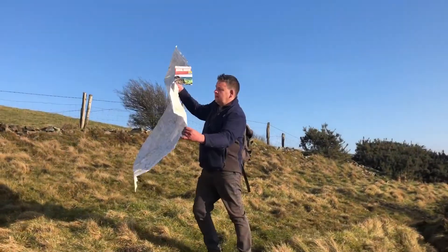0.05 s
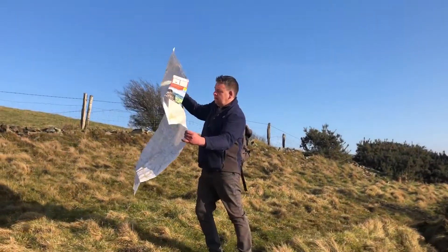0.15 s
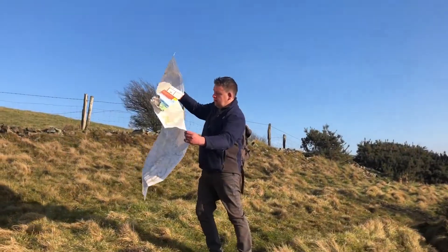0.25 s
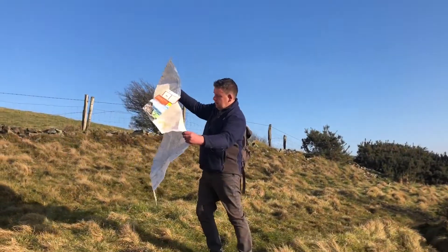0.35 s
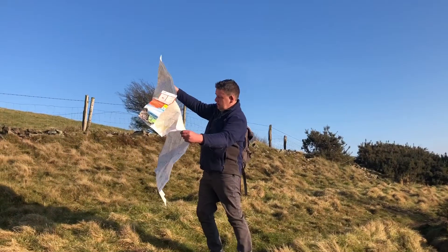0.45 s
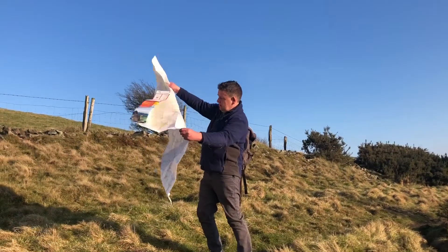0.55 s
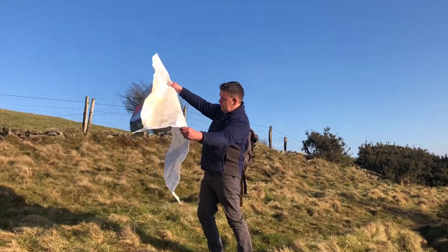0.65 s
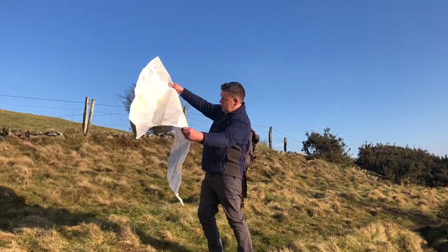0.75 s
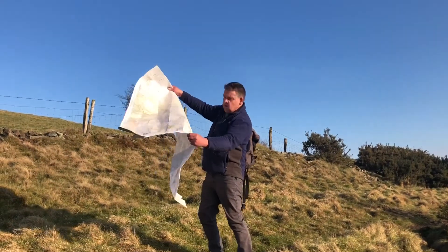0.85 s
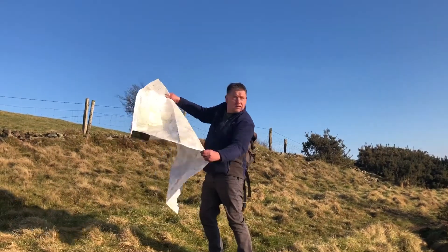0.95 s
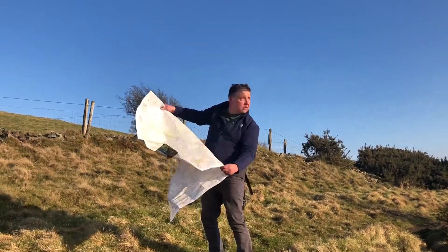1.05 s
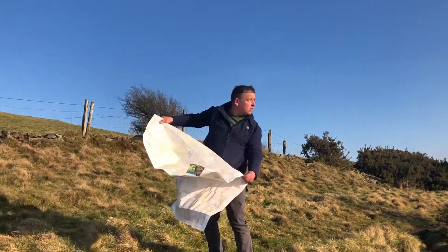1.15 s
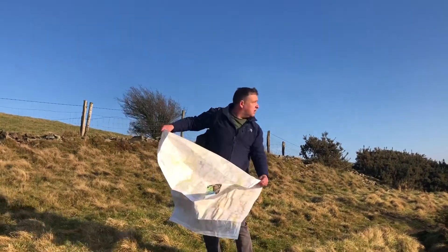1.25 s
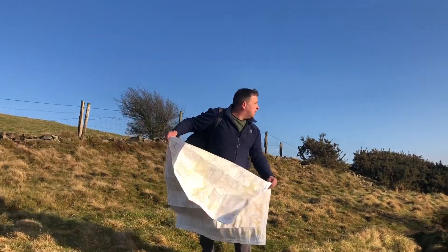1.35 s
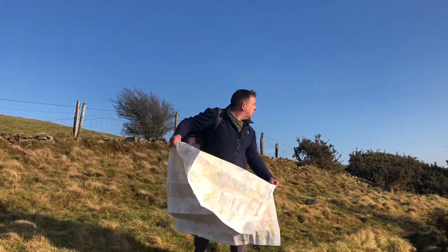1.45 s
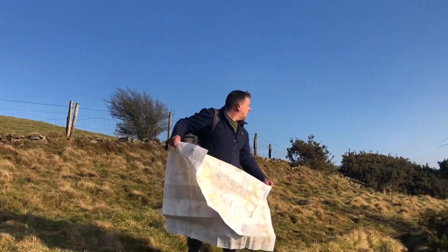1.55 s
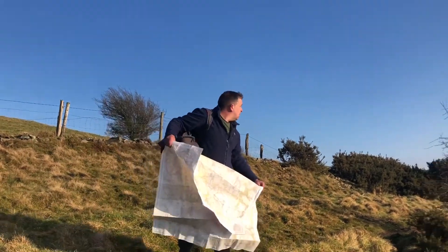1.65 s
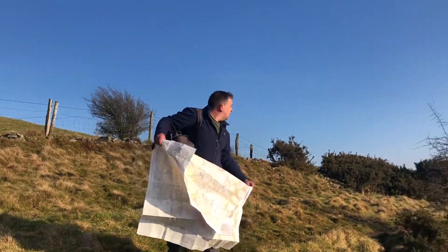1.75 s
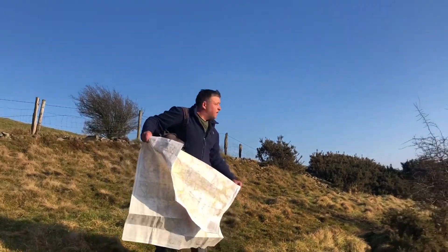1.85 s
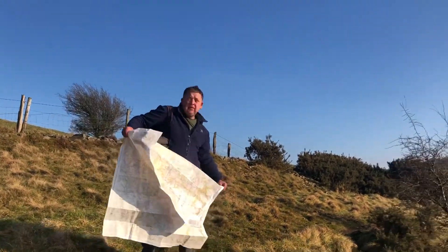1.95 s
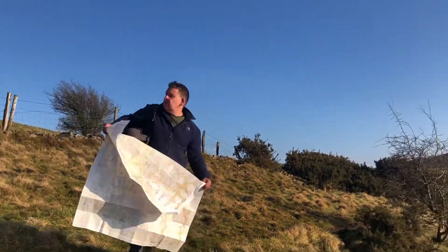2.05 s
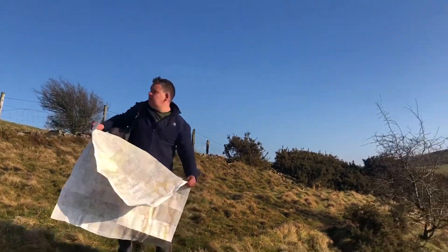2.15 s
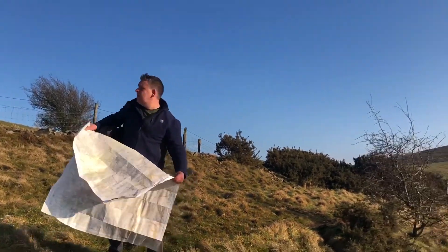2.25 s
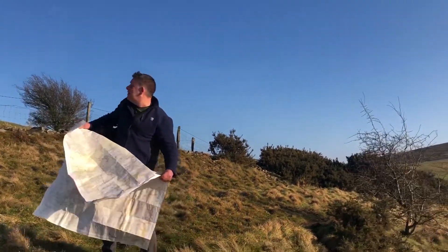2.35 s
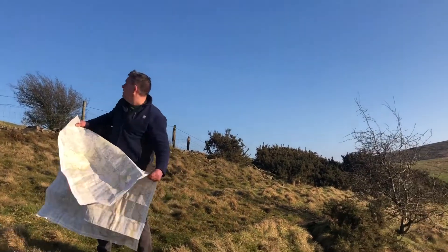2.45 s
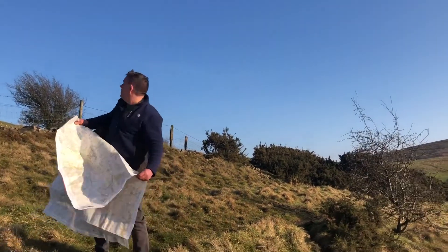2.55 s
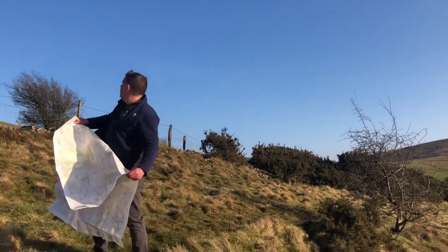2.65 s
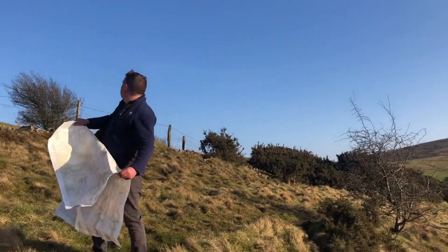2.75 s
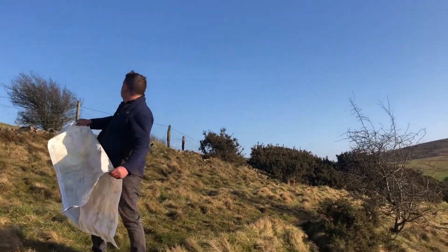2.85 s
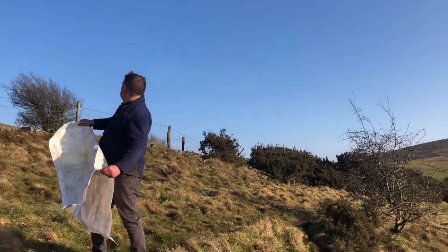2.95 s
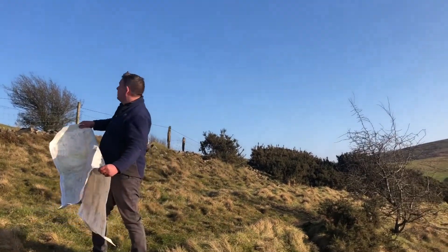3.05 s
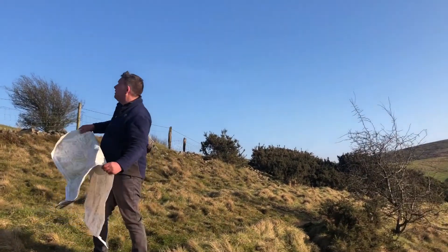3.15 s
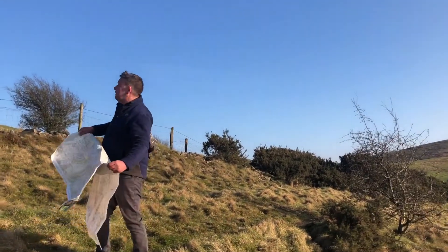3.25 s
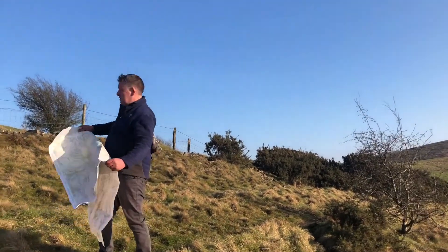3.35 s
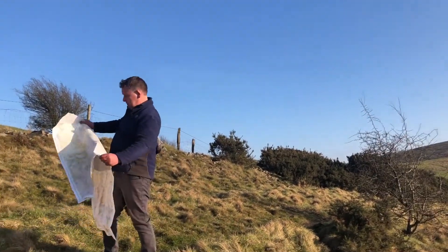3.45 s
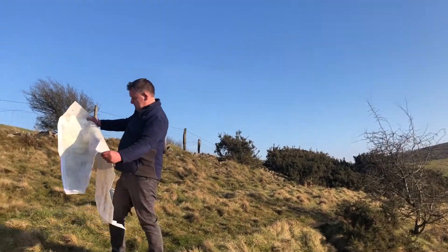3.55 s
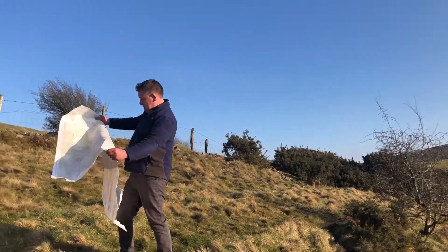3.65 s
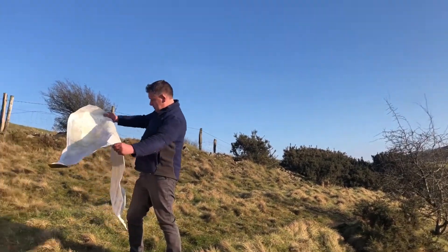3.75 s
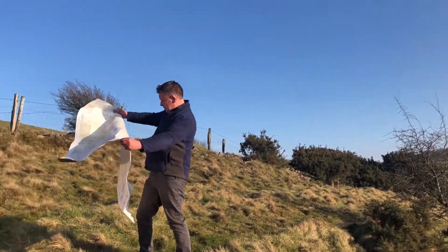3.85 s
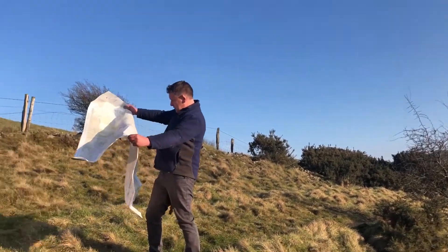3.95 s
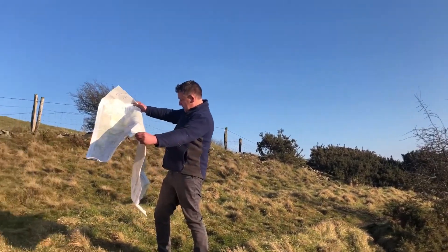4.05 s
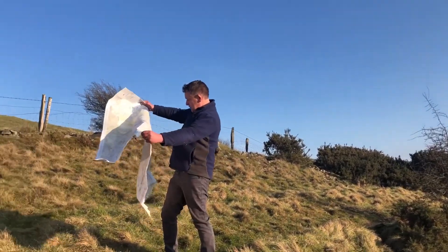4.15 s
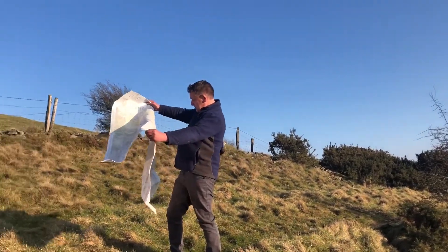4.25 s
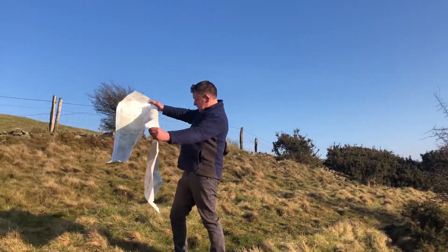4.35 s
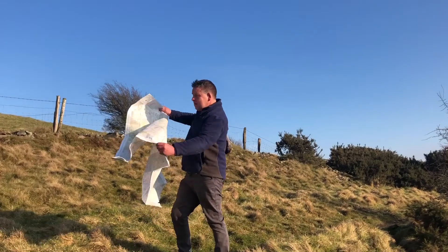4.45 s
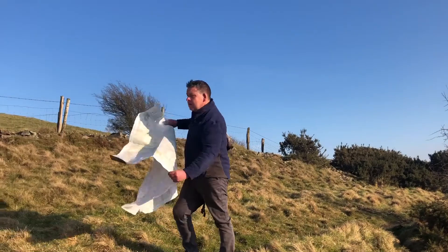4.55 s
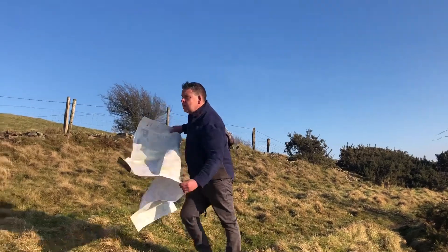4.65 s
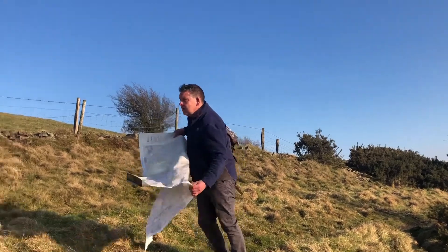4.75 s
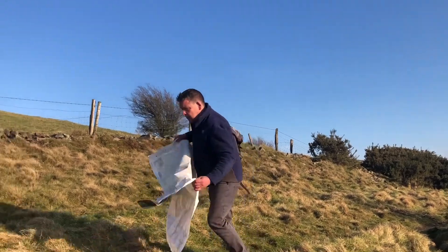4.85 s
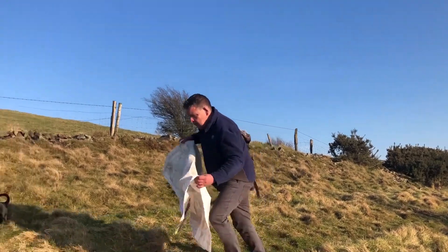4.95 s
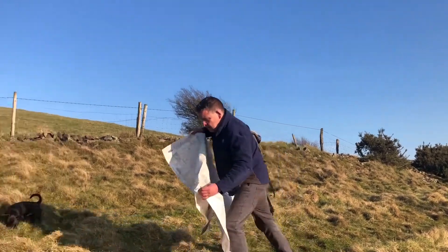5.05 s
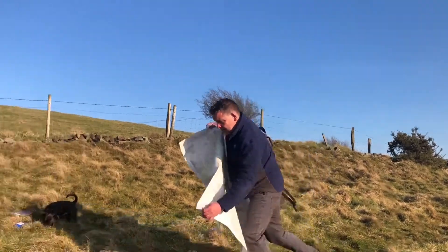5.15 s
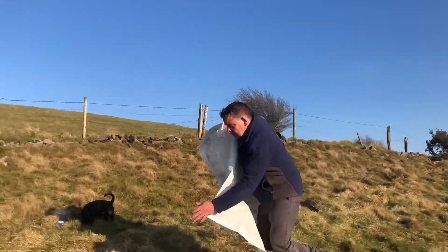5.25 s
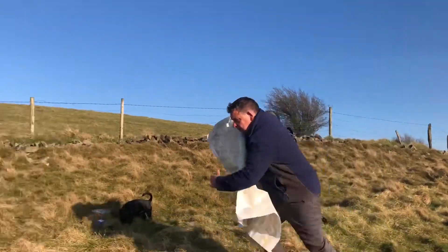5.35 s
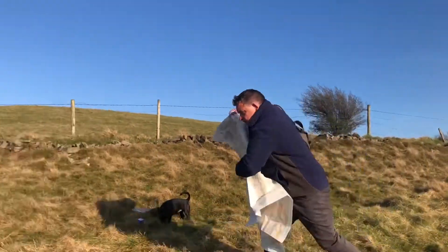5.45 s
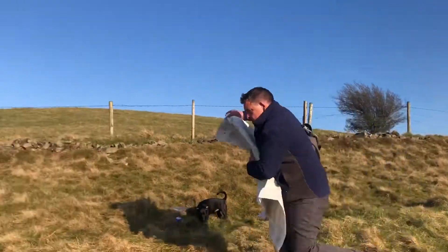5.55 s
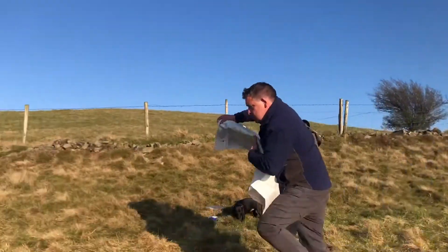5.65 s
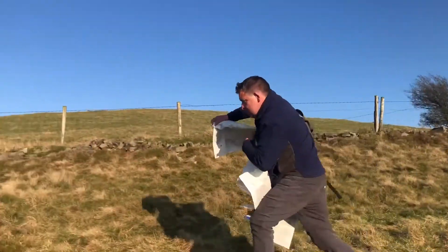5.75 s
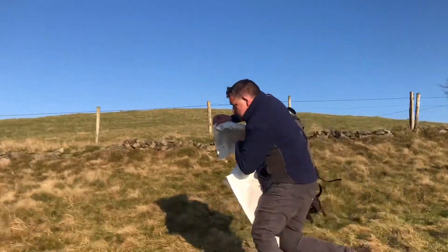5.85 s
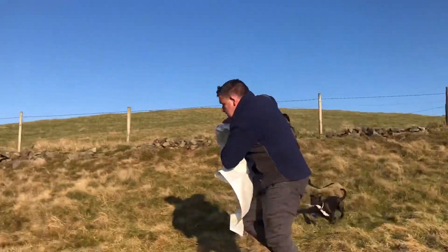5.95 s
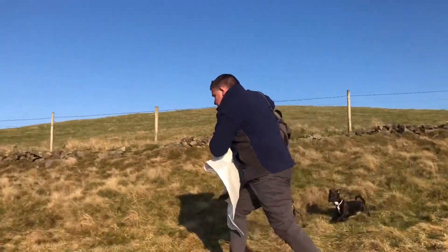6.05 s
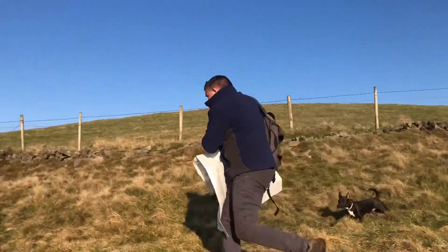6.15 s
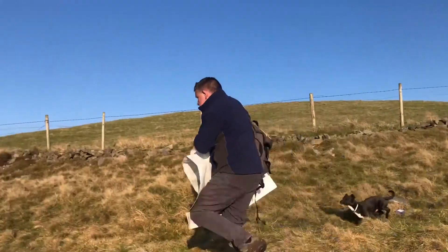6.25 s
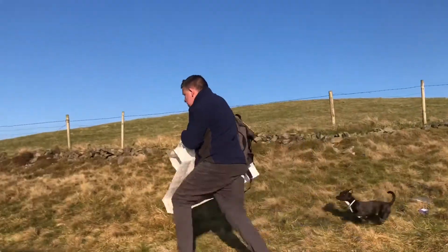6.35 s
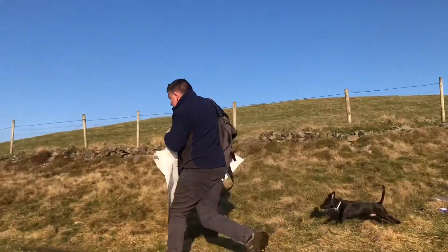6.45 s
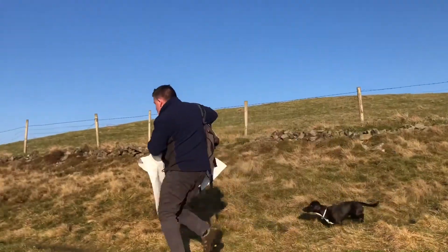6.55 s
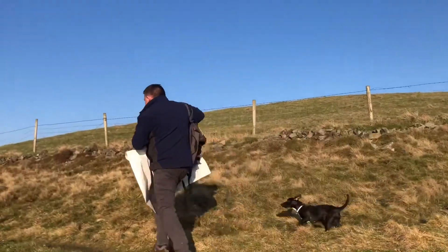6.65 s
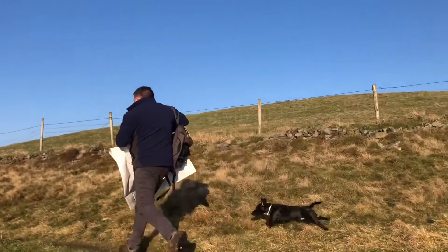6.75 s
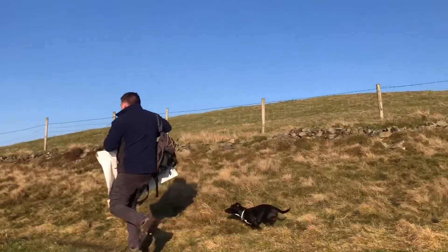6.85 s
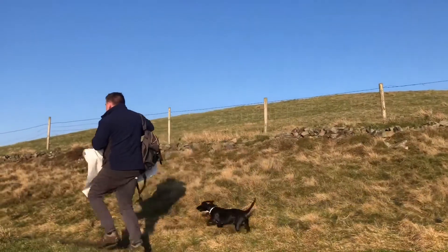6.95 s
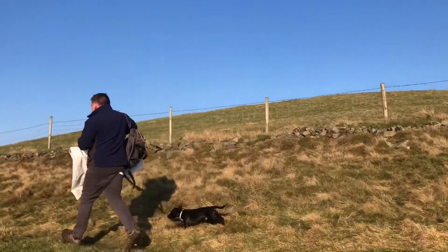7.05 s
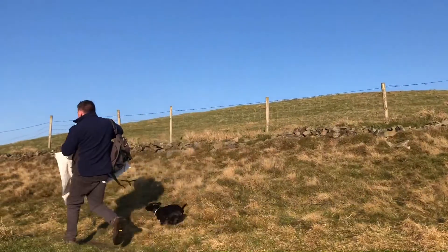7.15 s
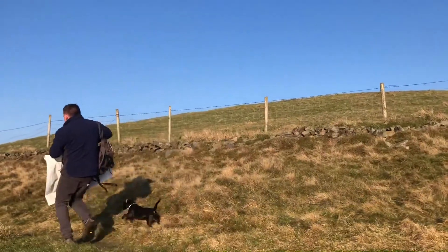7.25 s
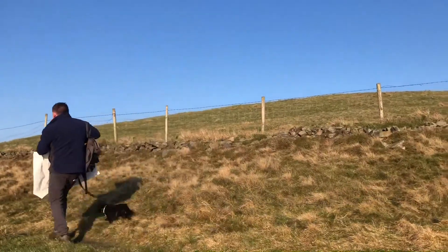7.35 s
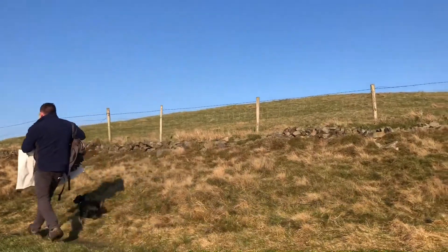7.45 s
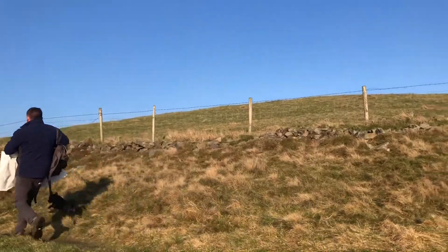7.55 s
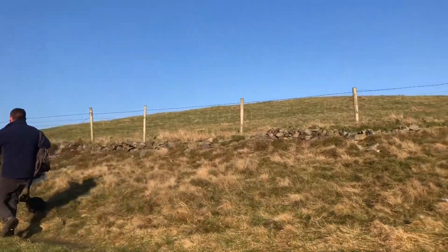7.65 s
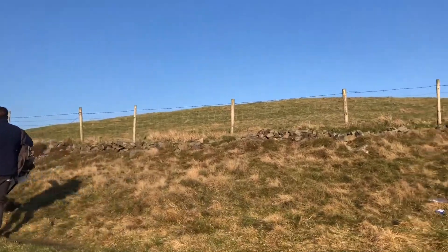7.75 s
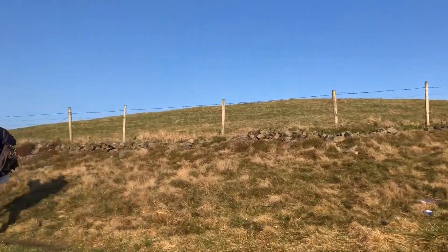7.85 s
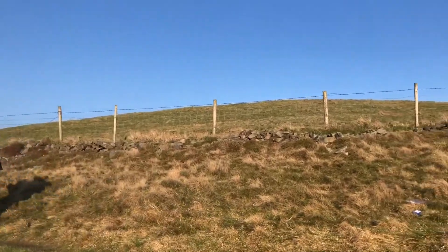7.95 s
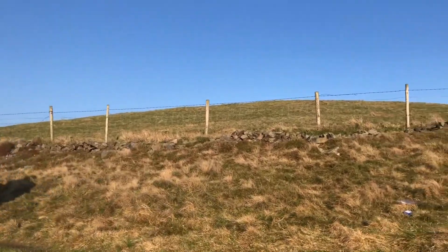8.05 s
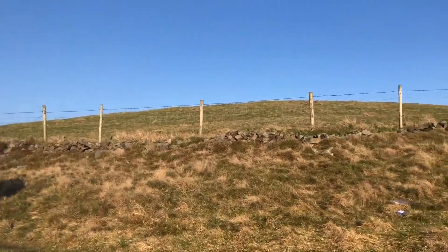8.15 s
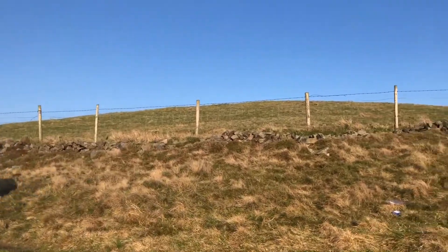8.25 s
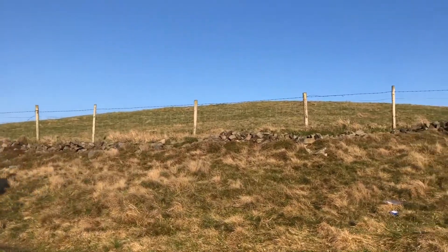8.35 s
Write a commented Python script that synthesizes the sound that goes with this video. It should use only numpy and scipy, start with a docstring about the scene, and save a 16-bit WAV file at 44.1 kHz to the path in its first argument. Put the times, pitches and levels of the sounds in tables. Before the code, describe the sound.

Close, uneven crinkling and snapping of a big paper sheet, growing busier before fading over faint, dull steps on grass.

```python
"""Paper map on a hillside

A large paper map is turned, shaken and bundled up; its holder then walks off through dry grass.
Each crease that buckles sends a burst through the sheet: treble first and short, bass later and longer.
The bursts drive bands of noise that stand for the sheet's dense modes. Footsteps thud on the turf,
and a quiet low wash of air and a faint rising drone lie underneath."""
import sys
import numpy as np
from scipy import signal
from scipy.fft import rfft, irfft, next_fast_len
from scipy.io import wavfile
from scipy.ndimage import uniform_filter1d

SR = 44100
rng = np.random.default_rng(int(sys.argv[2]) if len(sys.argv) > 2 else 0)


def unload_wav(signal):
    """Save mono or channel-first audio to the path in sys.argv[1] as 16-bit WAV at rate SR, clipped to [-1, 1]."""
    wavfile.write(
        sys.argv[1],
        SR,
        np.round(np.clip(np.atleast_2d(signal).T, -1, 1) * 32767).astype(np.int16),
    )


N = 370881
BURST_SAMPLES = 4096
FFT_SIZE = next_fast_len(N + BURST_SAMPLES)
BINS_HZ = np.fft.rfftfreq(FFT_SIZE, 1 / SR)
TIME_S = np.arange(N) / SR

# Bands of the sheet, which scale each buckle's level and decay: centre_hz, share_db, ring_factor, lag_ms
SHEET_BANDS = [(121.6, -16, 2.5, 4.3), (278, -10.5, 3, 7.3), (730, -10.5, 3.3, 1.1), (1115, -7, 2.96, 0.25),
               (2690, -6.5, 1.68, 0.77), (4620, -4, 1.42, 0.27), (8300, -0.5, 1.21, 0.085),
               (13170, -12.5, 0.085, .05)]
# Fader ride of the rustle as the sheet moves: time_s, level_db
RUSTLE_LEVEL = [(0,-63),(.28,-47.5),(.46,-72),(.54,-53),(.72,-71.5),(.81,-57),(1.05,-63.5),(1.3,-63.5),(1.71,-65),(1.76,-53),
                (2.18,-61),(2.32,-71.5),(2.75,-81.5),(3.09,-76.5),(3.36,-78.5),(3.43,-36.5),(3.49,-66),(3.65,-67),(3.78,-86.5),
                (4.368,-89.5),(4.4,-46.5),(4.51,-44.5),(4.74,-54.5),(4.82,-43.5),(4.98,-50.5),(5.51,-39),(5.79,-44.5),(5.91,-38),(6.19,-46.5),(6.28,-39),
                (6.41,-51),(7.32,-56.5),(7.58,-65.5),(7.76,-60.5),(7.84,-70),(8.41,-72.5)]
# Brightness ride of the rustle: time_s, treble_tilt_db
RUSTLE_BRIGHTNESS = [(0,1),(.3,-21),(.9,-20),(1.3,-6),(1.75,-13),(2.1,-2),(2.6,-3),(3.1,4),(3.4,-3.5),(3.6,-21.5),(4.5,-14.5),(5.1,-4.5),(5.8,-8),(6.6,-5),(7.3,-7),(7.6,-3),(8.41,5.5)]
# Creases that snap: peak_s, level_db, bass_tilt_db, treble_tilt_db, base_t60_ms
CREASE_SNAPS = [(0.043,-41.5,-3,-11,28),(0.0643,-41,-18,-10,29),(0.0838,-40,-2,4,23),(0.096,-31,-37,-8.5,20),(0.1868,-25,-10.5,1,27),
                (.256,-33,-12,0,54),(0.3875,-31.5,-4.5,-0.5,43),(.42,-40.5,-2,-4,40),(.453,-35.5,-7,-31,9.7),(0.4877,-42,-3,-11,80),
                (0.5132,-32,-5.5,-14,29),(.582,-39,-9,3,18),(.616,-37.5,-8,-13,25),(0.6357,-37,1,5,43),(0.702,-42,2.5,-12,28),
                (0.774,-47,8,-21,12),(0.7965,-34.5,-9,-1,37),(.8733,-38.5,4,-11,13),(0.895,-36,-13,-16,22),(.91,-41,-12,-19,10),(0.964,-44,-5,-17,20),(.98,-41,-11,-22,28),(0.991,-35.5,-9,-26,18),
                (1.025,-36,-4.5,-7,35),(1.0404,-43.5,4,-6,42),(1.0652,-34,-2.5,-5,25),(1.097,-47,2,-15,20),(1.126,-43,4,-14,15),(1.1415,-32.5,-2.5,-12,19),(1.188,-38,5,-1,32),(1.2793,-44.5,9,-18,21),
                (1.301,-35,0,-9.5,28),(1.3794,-40.5,6,4.5,20),(1.435,-42.5,3.5,-15,16),(1.4647,-36.5,2,-19,25),(1.4747,-34.5,-5,-11,18),
                (1.622,-39,-0.5,-28,8.7),(1.7328,-36,-1,-10,11),(1.741,-33.5,0,-6,39),(1.7783,-34.5,2,-23,13),(1.8161,-43,8,-27,21),(1.8808,-34.5,5,-7,27),
                (1.9753,-37,4,-18,32),(1.9935,-30.5,-20,-3.5,6.4),(2.082,-52.5,18.5,-17,36),(2.1128,-33,-4,-14,12),(2.145,-38.5,5,-14,63),(2.1698,-31.5,-4,-1,17),
                (2.1833,-35.5,7,3.5,18),(2.198,-37,9,-13,17),(2.221,-30,-7,-5.5,15),(2.2495,-38,2,-7,19),(2.266,-28,-2,-11,17.5),
                (2.292,-46,12,-22,31),(2.375,-51.5,6,-27,20),(2.4,-54,2,-20,18),(2.4467,-56,10,-21,16),(2.4542,-43,-2,-50,15),(2.518,-54,4,-18,23),(2.5479,-33,-7.5,-14,15),
                (2.5852,-43.5,-0.5,-8,17),(2.74,-63,13,-20,17),(2.775,-45.5,0,-39,16),(2.7944,-46.5,3,-24,9.5),(2.8247,-51,7,-24,22),(2.953,-44.5,0.5,-32,15),
                (3.09,-34,-10,-35,17),(3.1712,-53.5,6,-22,20),(3.2078,-43.5,2,-37,12),(3.313,-54,3,-27,23),(3.3697,-34,-4.5,1,13),
                (3.3795,-28.5,-5,1,7.2),(3.41,-21,-3.5,2,18),(3.4347,-28.5,0,12,46.4),(3.5083,-37,-0.5,-5,9.7),(3.5367,-31.5,-1,-5,6.1),
                (3.55,-45.5,9.5,-26,13),(3.5848,-39,2.5,-12,17),(3.6111,-45.5,6.5,-6,32),(3.665,-41,-0.5,-18,30),(3.731,-52,13,-20,13),(3.768,-53,-4,-7,24),
                (4.0486,-71,20.5,0,16),(4.267,-71.5,13,-8,16),(4.377,-40.5,1,7,49),(4.4083,-31.5,-18,7,30),(4.465,-35.5,2,-3,16),(4.5029,-30,-14,4,18),
                (4.516,-27,-7,5,37),(4.5397,-25.5,-11,-2,12),(4.6626,-28,-10,-5,29),(4.707,-36,-7,-18,8.9),(4.7985,-39.5,7,17.5,23),
                (4.813,-23.5,-10,-6,10),(4.8322,-29,-22,4,11),(4.8479,-28.5,1,4,7.6),(4.8652,-25,-9,2.5,20),(4.8826,-33.5,-8,7,10),
                (4.9857,-37,0,-16,36),(5.113,-34,-14,-0.5,15),(5.1991,-24,-19,0.5,22),(5.323,-27.5,-2.5,-5,44),(5.539,-27,-13,1.5,18),
                (5.5795,-40,8,6,15),(5.6069,-33.5,18.5,19,5),(5.6148,-33,-3,0,54),(5.7462,-34.5,1.5,3.5,34),(5.794,-27.5,-24,-9,12),(6.0308,-31.5,-2,4,19),(6.0776,-38,4,17,11),
                (6.32,-32.5,-24,-3,20),(6.349,-50,-15,-12,12),(6.6964,-37.5,-13,-3,8.9),(6.7922,-35.5,-27,-7,37),(6.8884,-49,7,11,35),(7.002,-40,-17,-10,18),(7.03,-33.5,-9,-12,8.7),
                (7.14,-43,2,-22,11),(7.2373,-48,12,1,15),(7.2912,-38,0,-1.5,13),(7.3065,-46,4,-6,44),(7.445,-49,4,-15,14),(7.6492,-43.5,8,-18,9.4),(7.8219,-46,-18,-15,16)]
# Folds that give way slowly: peak_s, level_db, bass_tilt_db, treble_tilt_db, attack_ms, base_t60_ms
FOLD_CRUMPLES = [(.1671,-34,-25,-13,21,99),(0.245,-32,-19,-5.5,5.8,76),(0.271,-31.5,-3,-11,5.5,190),(0.2932,-25,-5.5,-2.5,6.8,32),
                 (0.3415,-34.5,0.5,-2,18,55),(0.5548,-30,-5,-7,4.6,36),(.815,-27,-6,-4.5,16.5,32),(0.93,-39,-21,-9,5,20),(1.53,-49.5,6,-24,3,86),
                 (1.8944,-38.5,2.5,-10,3,76),(2.021,-43.5,2,-12,4.3,84),(3.848,-44.5,2.5,-26,11,18),(4.4176,-32,0.5,9,3.4,41),(4.4348,-33,-11,-1,21,16),
                 (4.4901,-36,-1,-8,17,43),(4.5304,-31,-5.5,-25,10,75),(4.786,-37,3.5,-1,7,53),(4.922,-37,4,-15,33,18),(5.0608,-24,-8,-5.5,10,29),
                 (5.1435,-34.5,1,-19,3,51),(5.179,-31.5,-14,-17,3,49),(5.439,-33,-13,-2,5,20),(5.4746,-33,1,-1,4,74),(5.4946,-32,-4,-4,3,36),(5.5137,-38,10.5,1,4,135),(5.666,-30,-10,-9,3,100),
                 (5.8854,-33,-4,-2.5,41,53),(5.9328,-35.5,-10,-10,6.6,660),(6.153,-39.5,6,-8,24,53),(6.252,-33,-3,-9,17,45),(6.29,-35,-4,-1,4.5,28),(6.454,-47,11,-1,30,120),
                 (6.568,-35,2.5,-4.5,15,56),(6.6242,-43.5,10,-3,47,48),(6.645,-29,-24,-11,6.4,15),(6.9104,-43,-3,-5,5.5,13),(7.2766,-45,-2,-10,13,50),(7.338,-41.5,-5,-9,3,85),
                 (7.539,-40.5,-2,-5,12,18),(7.747,-44,2.5,-4,3.8,65),(7.7833,-44,-8,-13,13,24),(7.98,-47.5,-2,-65,14,45),(8.194,-47.5,4,-26,5.5,26),
                 (8.236,-50.5,1,-38,4,63),(8.3168,-54,8,-3,7,17)]
# Spectral shape of the air bed: frequency_hz, gain_db
AIR_SPECTRUM = [(18, -43), (30, -29), (51, 1.5), (69, -0.5), (86, 0.5), (103, -4), (251, -10.5),
                (1150, -29.5), (1310, -29.5), (1490, -42), (2660, -33.5), (9110, -28), (15800, -46)]
# Paper sliding softly over paper: middle_s, level_db, half_length_s
PAPER_SLIDES = [(3.088, -59.5, 0.064), (3.265, -67.5, .04)]
# Hurried steps on turf: peak_s, level_db
FOOTSTEPS = [(4.48,-59),(4.8,-67),(5.33,-54),(5.51,-53),(5.92,-50),(6.48,-55.5),(6.76,-64),(7.19,-54.5),(7.65,-72)]
# Overall tone colour, with a dip near 2.5 kHz, a bright top and a steep drop at 16 kHz:
# frequency_hz, gain_db
MASTER_EQ = [(30, -1.5), (300, -0.74), (1700, 1.47), (2100, 1.05), (2550, -1.5), (3200, 2), (5200, 0.2),
             (6200, -4.5), (9300, -5), (11000, -4), (13500, 12), (15300, 10.5), (15750, 15), (16000, -45.5),
             (16700, -9.5)]

BAND_HZ, BAND_SHARE_DB, BAND_RING, BAND_LAG_MS = np.transpose(SHEET_BANDS)[:, :, None]  # one row a band
BAND_COUNT = len(SHEET_BANDS)


def gain_of(db):
    """Decibels to an amplitude factor."""
    return 10 ** (np.asarray(db) / 20)


def unit_rms(x):
    """Scales each row to rms 1."""
    return x / np.sqrt(np.mean(x ** 2, axis=-1, keepdims=True) + 1e-20)


def curve_at(points, hz):
    """Reads a (frequency_hz, value) curve on a log-frequency axis."""
    point_hz, value = np.transpose(points)
    return np.interp(np.log(hz + 1), np.log(point_hz + 1), value)


def filtered(x, gains):
    """Filters x by gains given on the bins of its spectrum."""
    return irfft(rfft(x, FFT_SIZE) * gains, FFT_SIZE)[..., :N]


def equalised(x, curve):
    """Runs x through a (frequency_hz, gain_db) EQ curve."""
    return filtered(x, gain_of(curve_at(curve, BINS_HZ)))


def tilt_db(bass_db, treble_db, bass_hz=900, pivot_hz=3500, treble_hz=10000):
    """Tone control over the sheet's bands: a bass shelf and a treble slope either side of a pivot."""
    from_pivot = np.log(BAND_HZ / pivot_hz)
    shelf = np.clip(from_pivot / np.log(bass_hz / pivot_hz), 0, 1)
    slope = np.maximum(from_pivot / np.log(treble_hz / pivot_hz), 0)
    return shelf * bass_db + slope * treble_db


def buckle(attack_ms, base_t60_ms):
    """Power envelope of one buckle per band: bending waves are slower in the bass, so it peaks later."""
    t = np.arange(BURST_SAMPLES) / SR
    peak_s = (BAND_LAG_MS + attack_ms) / 1000
    t60_s = (base_t60_ms * BAND_RING + 4.8 * BAND_LAG_MS) / 1000
    attack = np.minimum(t / peak_s, 1) ** 3.7
    return attack * gain_of(-60 * np.maximum(t - peak_s, 0) / t60_s) ** 2


def rustle(buckles_per_s=140, firm_db=-43.5):
    """Power of countless small, uneven buckles over the smooth swish of paper and dry grass."""
    onsets = np.flatnonzero(rng.random(N) < buckles_per_s / SR)
    size_db = -1.5 * np.minimum(rng.exponential(1, N), 4)[onsets]
    tone_db = tilt_db(*2.2 * rng.standard_normal((N, 2))[onsets].T)
    # each buckle favours its own pitch range
    tone_db += 5.2 * np.clip(rng.standard_normal((N, BAND_COUNT))[onsets].T, -2, 1.6)
    triggers = np.zeros((BAND_COUNT, N))
    triggers[:, onsets] = gain_of(size_db + tone_db) ** 2
    crackle = np.abs(signal.oaconvolve(triggers, buckle(attack_ms=0.32, base_t60_ms=18), axes=1)[:, :N])
    crackle /= crackle.mean(axis=1, keepdims=True)
    swish_share = np.clip(0.36 + 0.4 * tilt_db(0.3, 0.5), 0, 1)  # smoothest in the treble
    level_db = np.interp(TIME_S, *np.transpose(RUSTLE_LEVEL))
    bass_db = 4.5 + 0.2838 * (firm_db - level_db)  # gentler handling is relatively richer in bass
    treble_db = np.interp(TIME_S, *np.transpose(RUSTLE_BRIGHTNESS))
    texture = swish_share + (1 - swish_share) * crackle
    return gain_of(level_db + tilt_db(bass_db, treble_db)) ** 2 * texture


def snaps_and_crumples():
    """Power of the foreground hits: creases that snap and folds that give way slowly."""
    power = np.zeros((BAND_COUNT, N + BURST_SAMPLES))
    # longer-ringing snaps also have a slower attack
    snaps = [(*hit, 0.51 + 0.03 * t60_ms, t60_ms) for *hit, t60_ms in CREASE_SNAPS]
    for peak_s, level_db, bass_db, treble_db, attack_ms, t60_ms in snaps + FOLD_CRUMPLES:
        start = round((peak_s - attack_ms / 1000) * SR)
        peak_power = gain_of(level_db + tilt_db(bass_db, treble_db)) ** 2
        power[:, start:start + BURST_SAMPLES] += peak_power * buckle(attack_ms, t60_ms)
    low_cut_db = -7.0 * np.maximum(np.log2(600 / BAND_HZ), 0)  # a small crease moves little air in the bass
    return power[:, :N] * gain_of(low_cut_db) ** 2


def drifting_modes():
    """Noise whose resonances come and go as the sheet changes shape."""
    frames = dict(nperseg=1024, noverlap=768)
    hz, _, spectrogram = signal.stft(rng.standard_normal(N + 1024), fs=SR, **frames)
    patches = uniform_filter1d(rng.standard_normal(spectrogram.shape), size=4, axis=0)
    patches = uniform_filter1d(patches, size=6, axis=1)
    depth_db = curve_at([(1200, 2.43), (3000, 1.0)], hz)[:, None]  # hollower in the bass
    return signal.istft(spectrogram * gain_of(depth_db * patches / patches.std()), **frames)[1][:N]


def paper():
    """The sheet's dense modes in overlapping bands, driven by buckling and sliding."""
    centres_hz = np.r_[BAND_HZ[0] / 2, BAND_HZ[:, 0]]  # the lowest band fades out an octave down
    band_position = np.interp(np.log(BINS_HZ + 1), np.log(centres_hz), np.arange(-1, BAND_COUNT))
    crossovers = np.cos(np.pi / 2 * np.clip(band_position - np.arange(BAND_COUNT)[:, None], -1, 1))
    modes = unit_rms(filtered(drifting_modes(), crossovers))
    jerks = unit_rms(uniform_filter1d(rng.standard_normal(N), size=24))  # a crease gives way in tiny jerks
    grit = unit_rms(gain_of(3.8 * np.clip(jerks, -2, 2) * np.clip(BAND_HZ / 5000, 0, 1)))
    envelope = np.sqrt(snaps_and_crumples() + rustle() + slides())
    bands = gain_of(BAND_SHARE_DB) * modes * grit * envelope
    return filtered(bands, np.sqrt(np.abs(crossovers))).sum(axis=0)  # each band stays in its own range


def air(level_db=-65, swell_db=0.49):
    """Low wash of open air with a faint hiss, swelling slightly."""
    rates_hz = np.geomspace(0.2, 6, num=20)
    swell = unit_rms(sum(np.sin(2 * np.pi * (hz * TIME_S + rng.random())) / np.sqrt(hz) for hz in rates_hz))
    wash = unit_rms(equalised(rng.standard_normal(N), AIR_SPECTRUM))
    return gain_of(level_db + swell_db * swell) * wash


def drone(peak_db=-64, peak_s=2.1, end_s=3.9, rise_db_per_s=45, fade_db_per_s=8, climb_hz_per_s=21):
    """A faint far tone that climbs steadily, swells and fades, slightly unsteady."""
    waver = unit_rms(uniform_filter1d(rng.standard_normal(N), size=4000))
    pitch_hz = (115 + climb_hz_per_s * (TIME_S - 1.9)) * (1 + 0.0028 * waver)
    tone = np.sqrt(2) * np.sin(2 * np.pi * np.cumsum(pitch_hz) / SR)
    level_db = peak_db - np.maximum(rise_db_per_s * (peak_s - TIME_S), fade_db_per_s * (TIME_S - peak_s))
    return gain_of(level_db + 1.4 * waver) * (TIME_S < end_s) * tone


def slides():
    """Power of paper gliding over paper: thin, smooth swishes that swell and fade."""
    swell = sum(gain_of(level_db) ** 2 * np.clip(1 - ((TIME_S - middle_s) / half_s) ** 2, 0, 1) ** 2
                for middle_s, level_db, half_s in PAPER_SLIDES)
    return gain_of(tilt_db(bass_db=-4, treble_db=-2.5)) ** 2 * swell


def footsteps(attack_s=0.048, t60_s=0.65):
    """Feet on turf: dull, lumpy thuds through the ground."""
    rumble = equalised(rng.standard_normal(N), [(25, -41), (60, 0), (110, -1), (200, -15), (500, -70)])
    envelope = np.zeros(N)
    for peak_s, level_db in FOOTSTEPS:
        attack = np.clip((TIME_S - peak_s) / attack_s + 1, 0, 1)
        envelope += attack * gain_of(level_db - 60 * np.maximum(TIME_S - peak_s, 0) / t60_s)
    return envelope * unit_rms(rumble)


def scene():
    """Mono mix of map, footsteps, air and drone."""
    return (paper() + footsteps() + air() + drone())[None]


def record(dry):
    """Overall tone colour with a bright top, then a steep low-pass."""
    low_pass = signal.firwin(511, cutoff=16850, window=("kaiser", 9), fs=SR)
    return signal.oaconvolve(equalised(dry, MASTER_EQ), low_pass[None], "same")


dry = scene()
out = record(dry)
unload_wav(out)
```